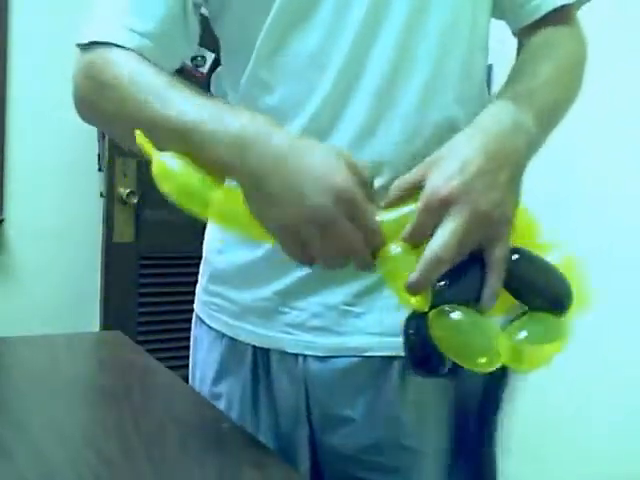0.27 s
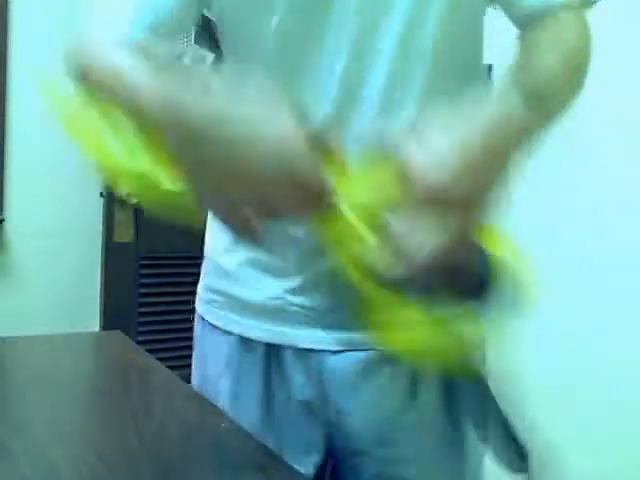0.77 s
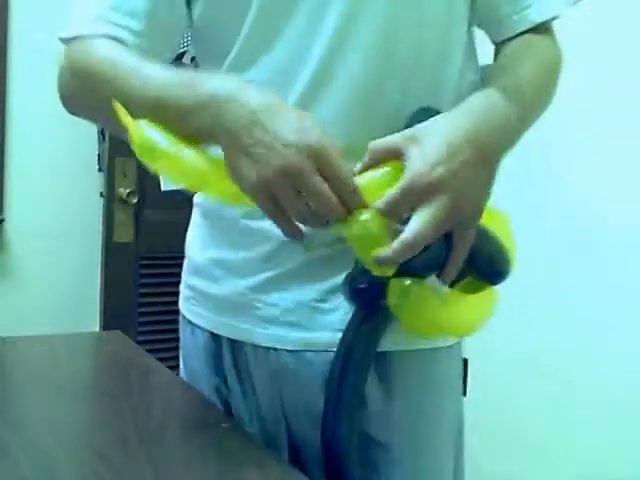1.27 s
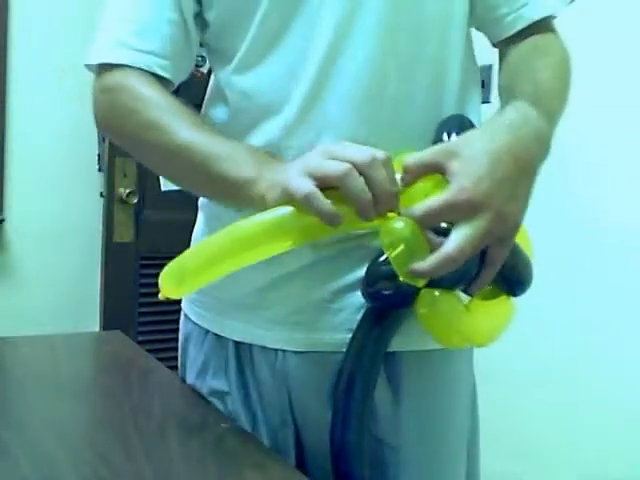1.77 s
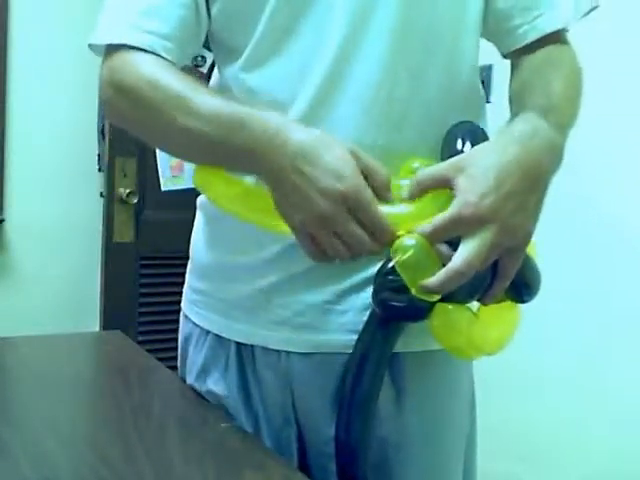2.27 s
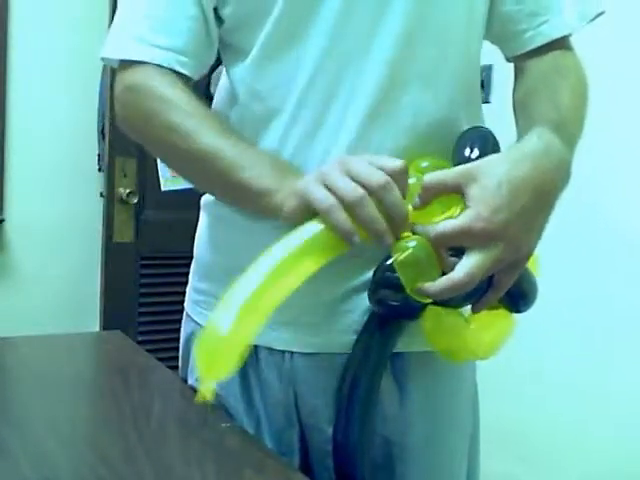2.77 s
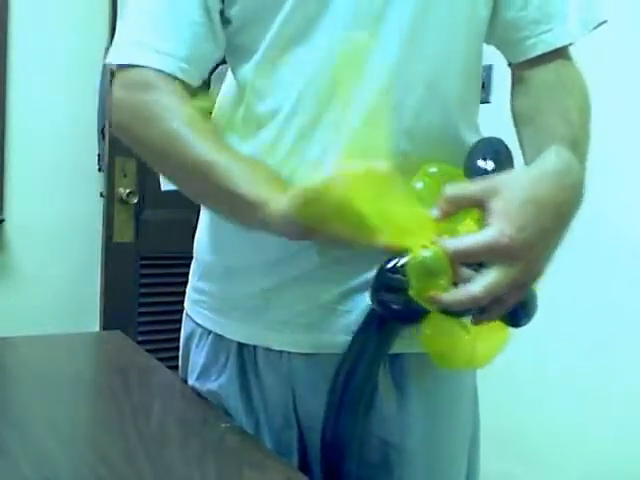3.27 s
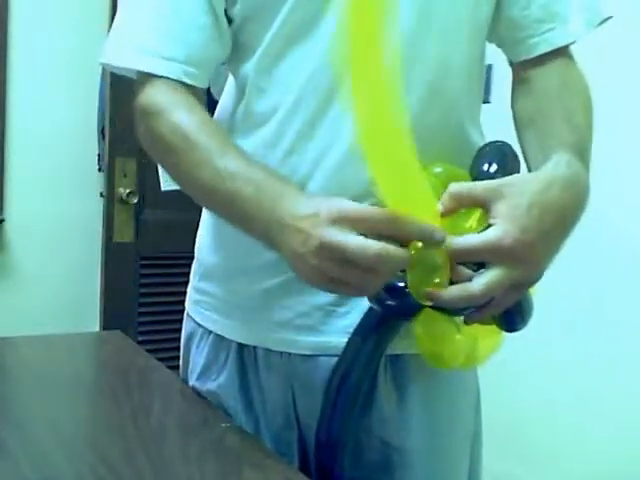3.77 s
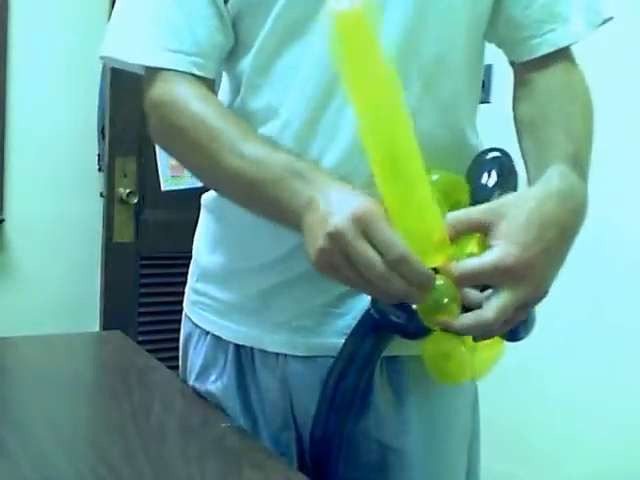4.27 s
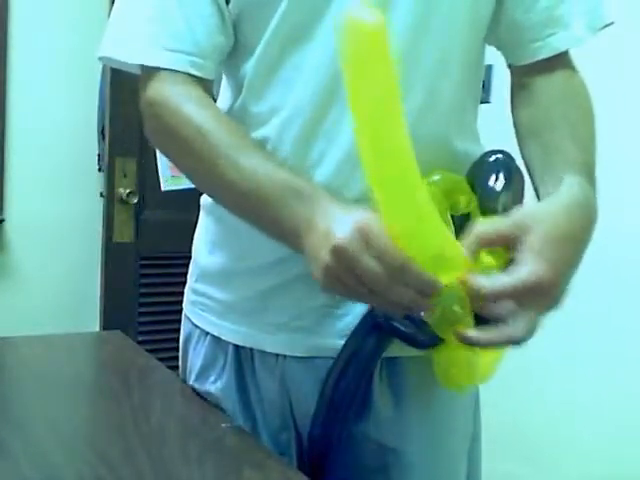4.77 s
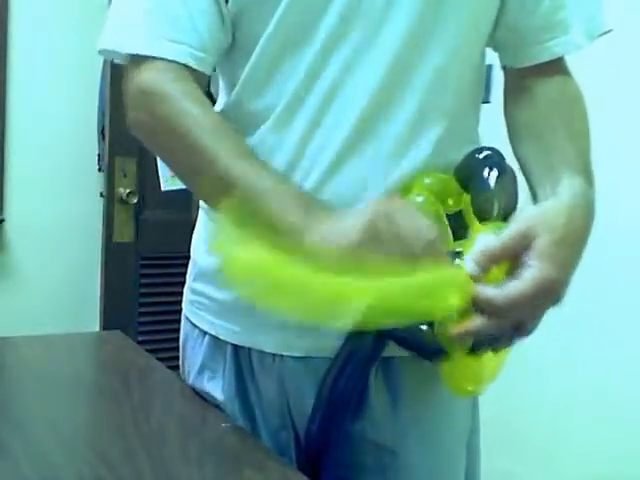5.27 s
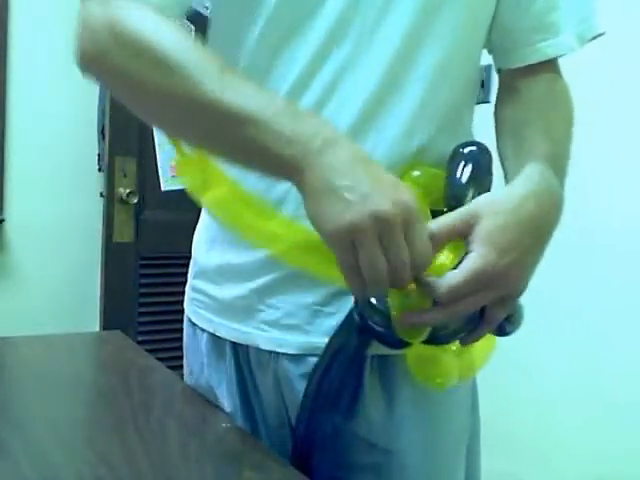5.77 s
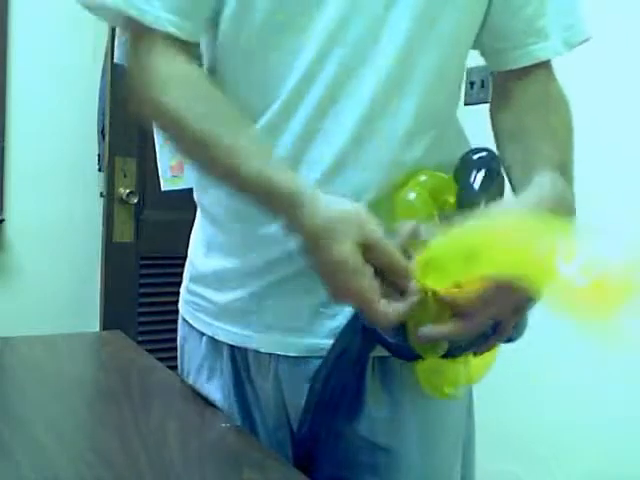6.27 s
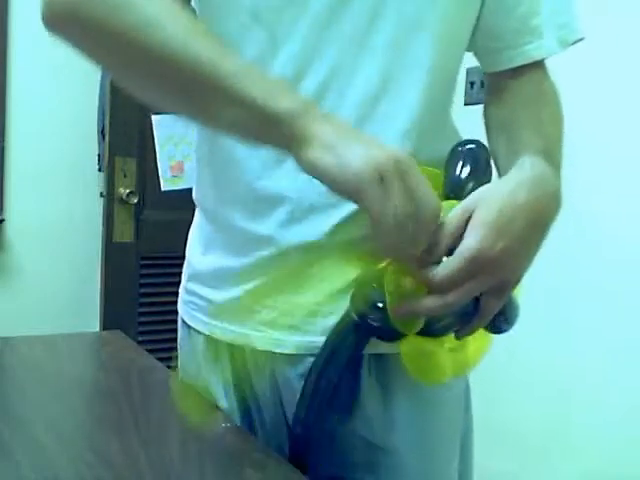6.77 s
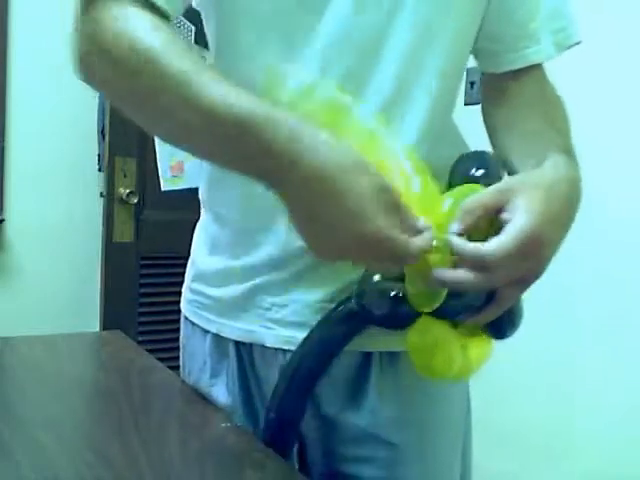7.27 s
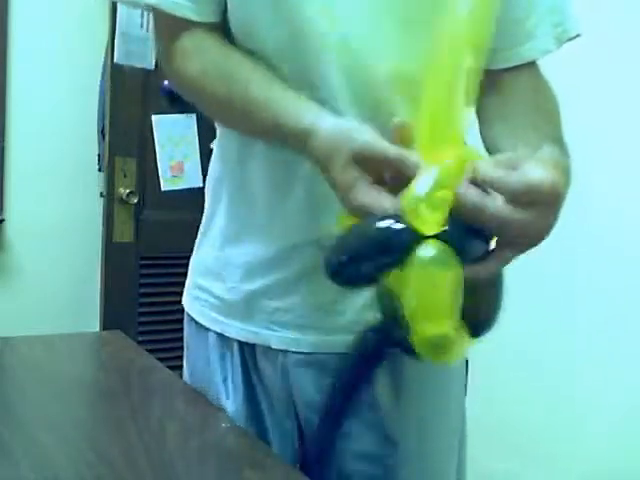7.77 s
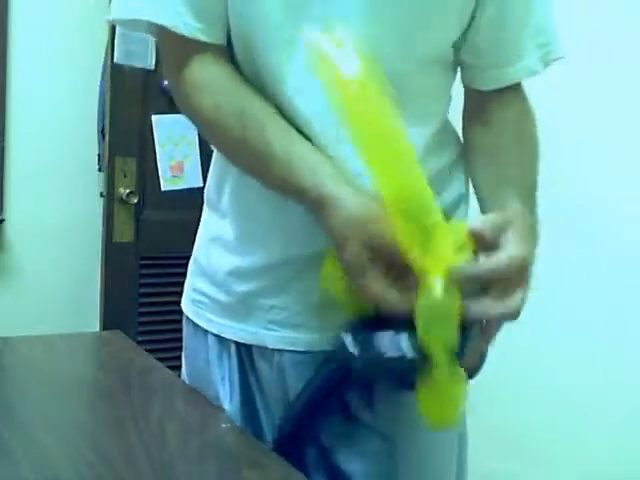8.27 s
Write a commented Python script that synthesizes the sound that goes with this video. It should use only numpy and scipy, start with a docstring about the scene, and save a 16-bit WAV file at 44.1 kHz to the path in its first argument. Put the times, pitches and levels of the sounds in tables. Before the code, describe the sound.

Latex balloons squeak, creak and snap as hands twist them in a small room, growing busier and louder.

```python
"""Hands twist long latex balloons in a small hard room, over room tone and a little mains hum.
The rubber sticks and slips, each slip ringing the taut skin and thumping the air inside: first come
single snaps, quick creaks and a rubbing crackle, thinning out around 2 s. From 4 s the twisting grows
busier and louder, with more low bumps against hands and shirt, up to a last hard snap near 8.4 s.
All of it goes through a cheap camera microphone that overloads on peaks and is dull above 8 kHz."""
import sys
import numpy as np
from scipy import signal
from scipy.fft import rfft, irfft, next_fast_len
from scipy.io import wavfile
from scipy.ndimage import map_coordinates

SR = 44100
rng = np.random.default_rng(int(sys.argv[2]) if len(sys.argv) > 2 else 0)


def store_wav(level_fs):
    """Save 16-bit WAV to argv[1]."""
    pcm = np.round(np.clip(np.atleast_2d(level_fs), -1, 1) * 32767)
    wavfile.write(sys.argv[1], SR, pcm.T.astype(np.int16))


N = 375070

# colour of the room tone: (frequency [Hz], relative level [dB])
ROOM_TONE_EQ = [(12, -27), (20, 9.5), (410, 8.5), (662, -17), (1040, -16), (1810, 3.5), (4370, -14.5),
                (7050, -8.5), (8200, -23), (10700, -66), (18000, -120)]
# mains hum: (frequency [Hz], level [dB])
MAINS_HUM = [(59, -58.5)]
# reverb time of the room: (frequency [Hz], t60 [s])
ROOM_DECAY = [(150, 0.4), (700, 0.23), (3000, 0.18), (7000, 0.2)]
# the balloons bump hands and shirt: (time [s], level [dB], pitch [Hz])
BUMPS = [(0.116, -35, 212), (0.121, -24.5, 446), (0.242, -28.5, 188), (0.561, -29, 236), (0.77, -28.5, 143),
         (1.403, -35, 136), (2.204, -37.5, 172), (4.34, -30.5, 217), (4.8, -31, 244), (5.069, -28.5, 191),
         (5.333, -32, 200.5), (5.503, -21, 210.6), (5.858, -20, 227.5), (6.291, -21.5, 217),
         (6.584, -22, 130), (7.043, -24, 210.4), (7.276, -27.5, 107), (7.751, -22, 230),
         (7.822, -20.5, 170), (8.114, -18.5, 161.6), (8.461, -28, 147)]
# air resonances in the twisted bubbles: (frequency [Hz], width [Hz], gain [dB])
AIR_MODES = [(352, 88, -6.5), (497.5, 59.5, 6.5), (668, 129, 5), (862, 176, 3.5), (1380, 624, -5)]
# colour of the rubbing hiss: (frequency [Hz], relative level [dB])
HISS_EQ = [(410, -42), (700, -5.5), (4420, -7), (7100, -7), (8200, -44), (10700, -69), (18000, -120)]
# rubbing strokes; an air send is how hard the air inside is driven, relative to the skin:
# (time of full strength [s], swell [s], hold [s], skin level [dB], air send [dB], skin pitch [Hz])
RUB_STROKES = [(0.044, 0.059, 0.014, -34, 1, 2550), (0.135, 0.023, 0.0058, -23, -9, 2470),
               (0.334, 0.027, 0.11, -29, -7.5, 2600), (0.523, 0.13, 0.058, -21, -7.5, 2680),
               (0.739, 0.011, 0.0069, -14.5, -8, 2650), (0.941, 0.057, 0.0037, -25, -3, 2700),
               (1.13, 0.12, 0.006, -29.5, -7, 2000), (1.063, 0.016, .01, -36, 1, 2500),
               (1.286, 0.025, .22, -33.5, -3, 2520), (1.585, 0.031, 0.036, -23, -6, 3080),
               (1.876, 0.13, 0.011, -25, -5, 2680), (2.0, .05, 0.36, -40.5, -2.5, 2980),
               (2.133, 0.13, .01, -33, -26.5, 3500), (2.44, 0.012, 0.047, -21.5, -8.5, 2250),
               (2.613, 0.058, 0.036, -28, -7, 2500), (2.949, .15, .3, -40, -8, 2970),
               (3.125, 0.01, 0.0076, -44, -39, 3440), (3.424, .15, 0.04, -25.5, -5, 2290),
               (3.634, 0.014, .01, -20.5, -26, 2440), (3.788, 0.068, 0.062, -30, -44, 2540),
               (4.146, 0.12, .005, -20, -4, 2680), (4.341, 0.045, 0.0089, -29, 6.5, 2770),
               (4.541, 0.37, 0.003, -20.5, -10.5, 2700), (4.742, 0.059, 0.034, -20, -9, 2400),
               (4.96, 0.052, .01, -16, -13.5, 2480), (5.114, 0.15, 0.0034, -13.5, -10.5, 2730),
               (5.342, 0.05, 0.025, -15.5, -8.5, 1990), (5.473, .06, .17, -17, -7, 2280),
               (5.749, .05, 0.0069, -16.5, -17, 2240), (5.825, .05, 0.012, -18, -3, 1410),
               (5.927, 0.011, 0.0091, -12.5, -7, 2940), (6.215, .12, 0.019, -14, -6.5, 2000),
               (6.43, 0.046, .01, -23, -8, 2440), (6.587, 0.049, .1, -16.5, -6.5, 2740),
               (6.878, 0.049, 0.017, -19, -19, 2570), (7.099, 0.061, 0.0033, -14.5, -5.5, 1740),
               (7.279, 0.072, 0.043, -14.5, -18.5, 2100), (7.367, 0.052, 0.049, -17, -17, 2890),
               (7.603, 0.014, 0.0026, -21.5, -7, 2600), (7.758, 0.072, 0.0038, -15.5, -8, 2360),
               (7.878, 0.079, 0.0045, -15.5, -6, 2220), (7.996, .04, 0.023, -24, -3, 2310),
               (8.129, 0.065, 0.015, -20.5, -12.5, 2330), (8.268, .09, 0.04, -22, -4.5, 2300),
               (8.399, 0.052, 0.006, -15.5, -1.5, 2280)]
# creaking runs of slips: (start [s], end [s], first rate [slips/s], last rate [slips/s],
# first level [dB], last level [dB], air send [dB], skin pitch [Hz], ring t60 [s])
CREAK_RUNS = [(0.018, 0.045, 140, 170, -25, -23.5, 0, 3240, 0.0019),
              (0.504, 0.524, 170, 170, -17, -15.5, -20, 2160, 0.0067),
              (0.914, 0.945, 195, 250, -7.5, -5.5, -5.5, 2080, 0.0013),
              (1.563, 1.585, 280, 680, -19, -7.5, -25, 1610, 0.008),
              (1.647, 1.653, 470, 620, -6, -19, -21, 3106, 0.015),
              (2.055, 2.057, 280, 440, -21, -35.5, -32, 2500, 0.022),
              (4.0722, 4.146, 135, 610, -16.5, -11.5, -0.5, 2870, 0.0048),
              (4.319, 4.334, 270, 340, -16, -14.5, -9.5, 2900, 0.0068),
              (5.335, 5.356, 400, 370, -9.5, -0.5, -11, 1950, 0.0034),
              (5.476, 5.502, 360, 340, -2.5, -2.5, -16.5, 2070, 0.0049),
              (5.506, 5.541, 260, 330, -7, -9.5, -2, 1830, 0.0085),
              (5.729, 5.738, 160, 340, -20, -15.5, -25, 2850, 0.024),
              (5.793, 5.826, 880, 720, -13, -20.5, -4.5, 1610, 0.0047),
              (5.916, 5.936, 300, 480, -3.5, -4.5, -11, 3360, 0.0017),
              (6.878, 6.908, 300, 620, -10, -9, -7, 3100, 0.0012),
              (7.044, 7.088, 300, 400, -12, -19, 2, 1860, 0.0041),
              (7.865, 7.894, 244, 410, -18.5, -8, -13, 2720, 0.0085),
              (7.984, 8.037, 130, 76, -15.5, -17, -13, 1830, 0.0069)]
# clear single snaps: (time [s], skin level [dB], air send [dB], skin pitch [Hz])
SNAP_HITS = [(0.1224, -24, 12.5, 1550), (0.1267, -16, -4, 3000), (0.2452, -30.5, 12.5, 1120),
             (0.3151, -20, -3.5, 1690), (0.423, -17.5, -0.5, 1930), (0.4898, -20, -12.5, 2610),
             (0.5751, -12, -1.5, 1870), (0.672, -18, -4, 3060), (0.6938, -11, -12, 3000),
             (0.7343, -6.5, -5, 1830), (0.773, -16.5, 7.5, 1420), (0.8102, -16, -12, 2730),
             (0.8542, -14, -4.5, 5500), (0.8625, -16.5, 1.5, 2350), (0.902, -14.5, -5, 4500),
             (1.1216, -10.5, 6, 1770), (1.2859, -21, -4.5, 1700), (1.334, -20.5, -8, 1850),
             (1.3732, -19.5, 0.5, 3100), (1.4153, -15, -6, 3800), (1.4816, -28, 6.5, 3470),
             (1.518, -23.5, 1, 3030), (1.595, -11.5, -2, 2180), (1.6471, -16, -33, 3160),
             (1.6531, -8, -7, 2830), (1.9623, -17.5, -7, 3680), (2.1132, -13, -37, 5300),
             (2.3329, -24.5, -20, 1830), (2.429, -13, -16, 1860), (2.4722, -12, -27, 1770),
             (2.6562, -16, -7.5, 2300), (3.044, -24.5, -3.5, 2940), (3.0836, -4, -33.5, 3170),
             (3.0946, -11.5, 6.5, 4040), (3.2144, -29.5, -18, 2770), (3.247, -27, -11, 4460),
             (3.3101, -31.5, 9.5, 3500), (3.394, -16.5, -19, 1740), (3.4196, -21, 2, 1680),
             (3.5863, -20.5, -18, 1770), (3.6272, -8.5, 1, 1810), (3.648, -15, -30, 2500),
             (3.8162, -18, -37, 2800), (4.2001, -13.5, 1.5, 2400), (4.219, -16.5, 4.5, 1140),
             (4.246, -25.5, 11.5, 1130), (4.278, -17.5, -14, 2570), (4.3478, -15.5, 5.5, 2580),
             (4.47, -22, -12, 2640), (4.5505, -20.5, -19.5, 5330), (4.7286, -15.5, -25, 2280),
             (4.81, -9, -10, 1280), (4.9227, -9, -21.5, 2030), (5.1242, -8.5, -10.5, 4030),
             (5.14, -17.5, -17, 1800), (5.2143, -15.5, -15.5, 2000), (5.372, -13, 12, 1880),
             (5.3896, -8, -27, 1535), (5.4546, -8.5, 3.5, 1740), (5.5824, -10, -3.5, 3630),
             (5.597, -9, -15, 3950), (5.6212, -8, -15.5, 1740), (5.6383, -12.5, -4.5, 2810),
             (5.7323, -13, -35, 2830), (5.787, -13.5, -7, 2680), (5.799, -14.5, -11, 1600),
             (5.8877, -13, -5.5, 2960), (5.9393, -8.5, -14, 1280), (6.082, -19, -2, 1610),
             (6.1465, -19.5, -7, 2500), (6.1775, -12, -6, 1960), (6.2525, -9.5, -13.5, 2330),
             (6.2704, -9, -4, 2800), (6.3521, -7.5, -10.5, 2460), (6.4224, -11, -6.5, 2820),
             (6.459, -20.5, 7.5, 2920), (6.5196, -16, -19, 2940), (6.5922, -3.5, -15, 4780),
             (6.5978, -13, 12.5, 2240), (6.6701, -11.5, -31, 1600), (6.7016, -9, 1, 4500),
             (6.7409, -11.5, -1.5, 1860), (6.8218, -19.5, -14, 2260), (6.8428, -12.5, 1, 4390),
             (6.8732, -6, -22.5, 2560), (6.959, -10.5, -22, 2970), (6.9777, -9, -38, 2930),
             (7.0242, -9.5, 5, 1690), (7.095, -9, -1.5, 1650), (7.1031, -4.5, -6.5, 2630),
             (7.211, -15, -0.5, 1800), (7.2465, -13.5, -5.5, 1720), (7.4683, -14, -26, 2940),
             (7.6037, -15, -6.5, 3020), (7.6784, -11.5, -25, 4320), (7.7457, -10.5, -1.5, 4380),
             (7.7562, -7, 2, 1900), (7.8215, -7.5, 1, 5300), (8.068, -18.5, -13, 2630),
             (8.1018, -16, -6, 3150), (8.118, -4, 1.5, 2630), (8.2229, -13.5, -15, 3080),
             (8.3915, -8.5, -29.5, 2140), (8.4425, -5.5, -3, 2500)]
# tone of the microphone: (frequency [Hz], gain [dB])
MIC_EQ = [(100, 6), (1000, 0.5), (5000, 4.5), (6500, -2.5), (7500, -8), (8100, -28.5), (8600, -78.5)]


def amp(db):
    return 10 ** (np.asarray(db) / 20)


def unit_rms(x):
    return x / np.sqrt(np.mean(x ** 2) + 1e-20)


def curve_at(points, hz):
    """Read a curve of (frequency [Hz], value) points on a log frequency axis."""
    frequencies, values = np.transpose(points)
    return np.interp(np.log(hz + 1), np.log(frequencies + 1), values)


def wobble(rate):
    """Smooth random modulation with rate knots a second."""
    return map_coordinates(rng.standard_normal(int(N * rate / SR) + 4), [np.arange(N) * rate / SR])


def filtered(x, response):
    """Shape x with a complex frequency response."""
    size = next_fast_len(N + SR // 2)
    return irfft(rfft(x, size) * response(np.fft.rfftfreq(size, 1 / SR)), size)[:N]


def noise(eq):
    """Coloured noise of rms 1."""
    return unit_rms(filtered(rng.standard_normal(N), lambda hz: amp(curve_at(eq, hz))))


def room_tone():
    """The bed: a low hush with a little wavering mains hum."""
    t = np.arange(N) / SR
    hush = amp(-46.5) * noise(ROOM_TONE_EQ)
    hum = sum(amp(db + 2.5 * wobble(14)) * np.sin(2 * np.pi * hz * t) for hz, db in MAINS_HUM)
    return hush + hum


def room_reverb(x):
    """Short reverb off hard walls; the hands move, so every quarter second gets a fresh tail."""
    out = np.zeros(N + 2 * SR)
    block, predelay = SR // 4, 150  # samples
    for start in range(0, N, block):
        hz, t, spectrum = signal.stft(rng.standard_normal(SR // 2), SR, nperseg=256)
        decay = amp(-60 * t / curve_at(ROOM_DECAY, hz)[:, None])
        tail = signal.istft(spectrum * decay, SR, nperseg=256)[1]
        wet = signal.fftconvolve(x[start:start + block], tail / np.linalg.norm(tail))
        out[start + predelay:][:len(wet)] += wet
    return out[:N]


def bumps(attack_s=.0015, t60=.32):
    """Soft low bumps: the air of a long balloon booms for a moment, its close partials beating."""
    out, t = np.zeros(N + SR), np.arange(SR // 3) / SR
    for time, db, hz in BUMPS:
        boom = sum(amp(partial_db) * np.sin(2 * np.pi * hz * ratio * t + rng.uniform(0, 2 * np.pi))
                   for ratio, partial_db in ((.45, -5), (.9, 0), (1, 2.4)))
        envelope = amp(db - 60 * t / t60) * (1 - np.exp(-t / attack_s))
        out[round(time * SR):][:len(t)] += envelope * boom / 3
    return out[:N]


def air_body(hz):
    """The hollow body: the response of the air in the bubbles, its modes alternating in polarity."""
    return sum((-1) ** k * amp(db) * 1j * hz * width / (centre ** 2 - hz ** 2 + 1j * hz * width)
               for k, (centre, width, db) in enumerate(AIR_MODES))


def slips(times, db, send_db, hz, tear, ring_t60, tear_t60):
    """Each slip rings the skin, cracks (one row of tear noise) and kicks the air: (skin, kicks)."""
    length = tear.shape[1]
    t = np.arange(length) / SR
    onsets = np.round(times * SR).astype(int)
    phase = 2 * np.pi * hz[:, None] * t
    overtone = amp(-8.5) * np.sin(1.634 * phase)  # second mode of the taut skin
    ring = (np.sin(phase) + overtone) * amp(-60 * t / ring_t60)
    dull_tear = signal.lfilter([1], [1, -.45], tear)  # rubber tears with a dull edge
    crack = dull_tear * amp(-60 * t / tear_t60) * (1 - np.exp(-t / .0001))
    grains = amp(db)[:, None] * (ring + crack)
    positions = onsets[:, None] + np.arange(length)
    skin = np.bincount(positions.ravel(), grains.ravel(), N)[:N]
    kicks = np.bincount(onsets, amp(db + send_db + 26), N)[:N]
    return np.array([skin, kicks])


def stroke_envelopes(swell_db=16, fade_db_per_s=144.5):
    """Each pull swells, holds and dies away: skin level [dB], air level [dB] and pitch [Hz] over time."""
    def power_sum(layers_db, touch_db):  # light contact between strokes sets the floor
        return 10 * np.log10(np.sum(amp(2 * layers_db), axis=0) + amp(2 * touch_db))

    t = np.arange(0, N + 64, 64) / SR
    full_at, swell, hold, db, send_db, hz = np.transpose(RUB_STROKES)[:, :, None]
    swell_left = np.maximum(full_at - t, 0) / np.maximum(swell, .005)
    released_s = np.maximum(t - full_at - hold, 0)
    stroke_db = db - swell_db * swell_left - fade_db_per_s * released_s
    skin_db = power_sum(stroke_db, touch_db=-41)
    air_db = power_sum(stroke_db + send_db, touch_db=-46)
    pitch = hz[stroke_db.argmax(axis=0), 0]  # the strongest stroke leads
    return [np.interp(np.arange(N) / SR, t, curve) for curve in (skin_db, air_db, pitch)]


def rubbing(slip_count=4000):
    """Skin drags on skin: a crackle of small, uneven slips over a rough hiss and a hollow drone."""
    skin_db, air_db, skin_hz = stroke_envelopes()
    when, strength, detune, thump = rng.random((slip_count, 4)).T
    at = (when * (N - 1)).astype(int)
    spread_db = np.interp(skin_db[at], [-34, -18], [22, 18])  # light touch ticks, hard rubbing rasps
    db = skin_db[at] + spread_db * (strength ** 3 - .5) - 1
    hz = np.clip(skin_hz[at] * np.exp(.37 * (detune - .5)), 800, 7500)
    send_db = air_db[at] - skin_db[at] + 6 * (thump - .5) - 3
    tear = .5 * rng.standard_normal((slip_count, 250))
    crackle, kicks = slips(at / SR, db, send_db, hz, tear, ring_t60=.0044, tear_t60=.013)
    grip = amp(3 * wobble(30) + 2.5 * wobble(150))
    hiss = amp(skin_db - 13) * unit_rms(grip * noise(HISS_EQ))
    drone = amp(air_db - 5.5) * unit_rms(grip * filtered(rng.standard_normal(N), air_body))
    return np.array([crackle + hiss + drone, kicks])


def creaks():
    """Under a steady pull one spot slips again and again, almost evenly and with the same sound."""
    out = np.zeros((2, N))
    ramp = np.linspace(0, 1, 200)
    for start, end, first_rate, last_rate, first_db, last_db, send_db, hz, ring_t60 in CREAK_RUNS:
        rate = first_rate + (last_rate - first_rate) * ramp
        slips_so_far = np.cumsum(rate) * (end - start) / len(ramp)
        count = int(slips_so_far[-1]) + 1
        scatter = rng.standard_normal((60, 502))[:count]  # a row for each slip
        jitter, accent, own_tear = scatter[:, 0], scatter[:, 1], scatter[:, 2:]
        progress = np.interp(np.arange(count) + .04 * jitter, slips_so_far, ramp)
        times = start + (end - start) * progress
        db = first_db + (last_db - first_db) * progress + .5 * accent
        shared_tear = rng.standard_normal(500)
        tear = .35 * shared_tear + .15 * own_tear
        out += slips(times, db, send_db, np.full(count, hz), tear, ring_t60, tear_t60=.012)
    return out


def snaps():
    """Rubber lets go all at once: one slip with a strong crack."""
    times, db, send_db, hz = np.transpose(SNAP_HITS)
    tear = .9 * rng.standard_normal((len(times), 600))
    return slips(times, db, send_db, hz, tear, ring_t60=.0065, tear_t60=.018)


def scene():
    """The mix: latex and its reverb up front, dry bumps and room tone underneath."""
    skin, kicks = snaps() + creaks() + rubbing()
    latex = skin + filtered(kicks, air_body)
    latex = filtered(latex, lambda hz: (1j * hz / (1j * hz + 150)) ** 2)  # balloons radiate little bass
    walls = amp(-5.5) * room_reverb(latex)
    return (latex + walls + bumps() + room_tone())[None]


def record(dry):
    """A dull microphone; doubling its low sample rate mirrors the treble upward, and peaks overload."""
    mirror_top_hz, cutoff_hz = 15500, 16839
    dull = filtered(dry[0], lambda hz: amp(curve_at(MIC_EQ, hz)))
    flipped = dull * (-1.) ** np.arange(N)  # turns the spectrum upside down
    mirror = filtered(flipped, lambda hz: amp(-5) / (1 + (hz / mirror_top_hz) ** 200))
    channel = dull + mirror
    clipped = channel / (1 + np.abs(channel) ** 30) ** (1 / 30)  # nearly hard knee
    return filtered(clipped, lambda hz: amp(-4 * (hz > mirror_top_hz)) * (hz < cutoff_hz))[None]


dry = scene()
out = record(dry)
store_wav(out)
```